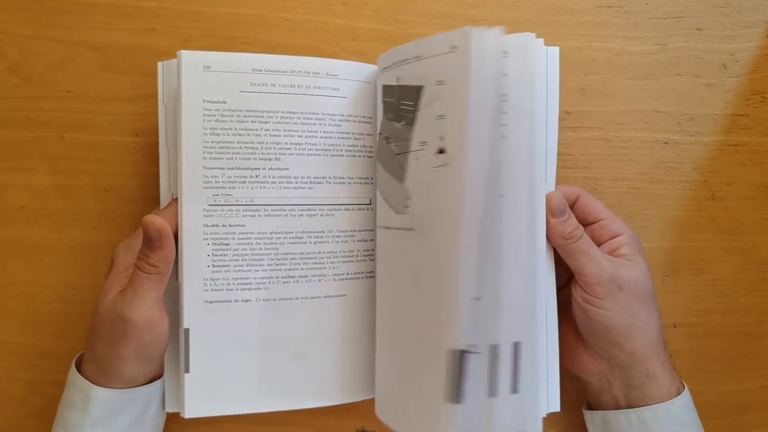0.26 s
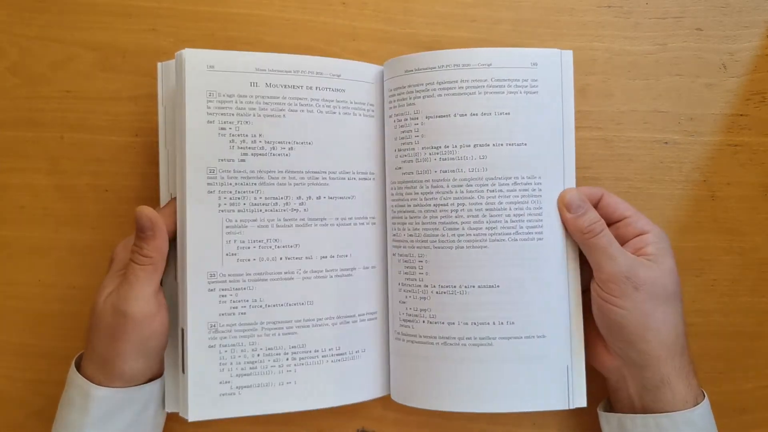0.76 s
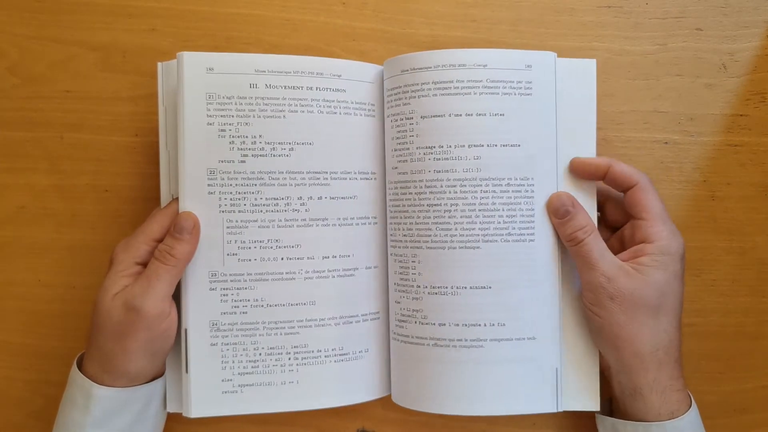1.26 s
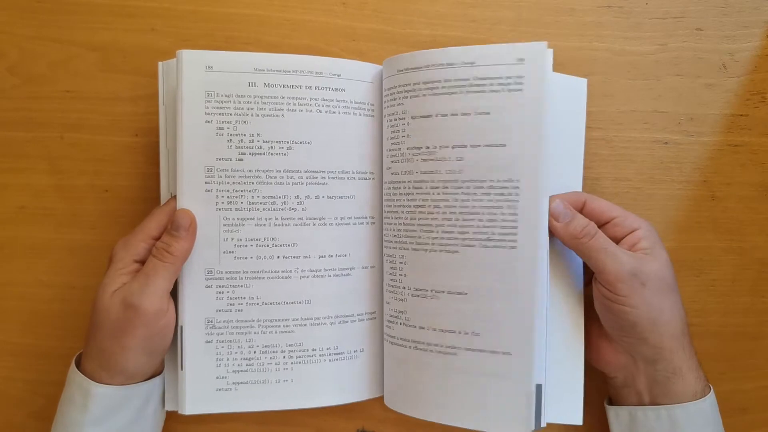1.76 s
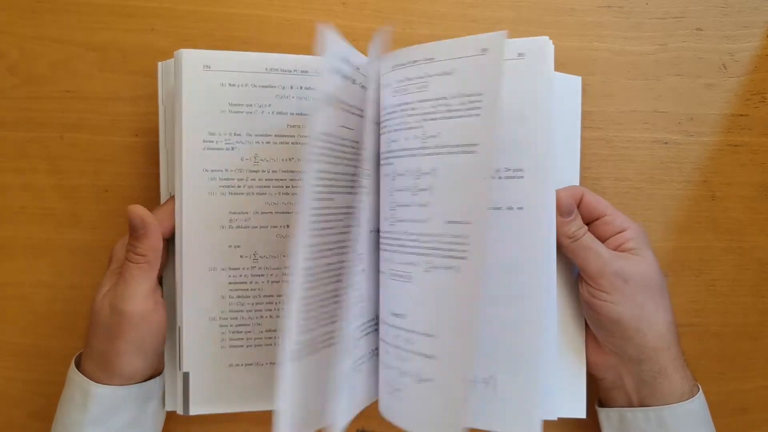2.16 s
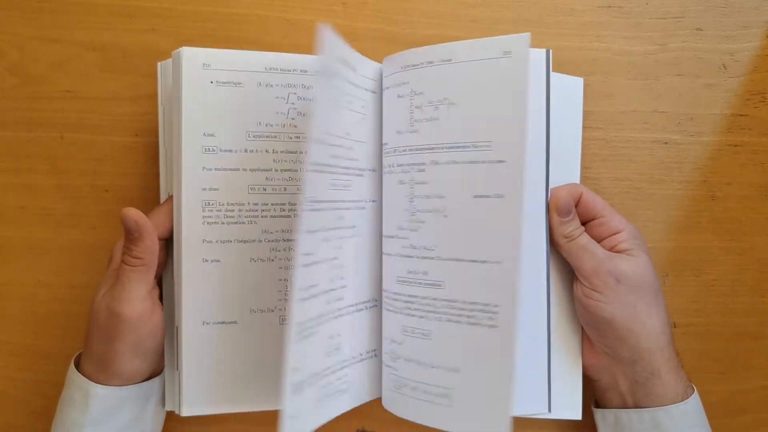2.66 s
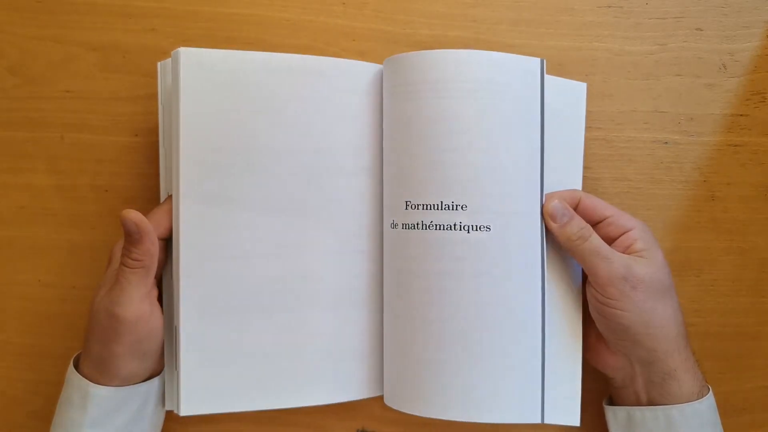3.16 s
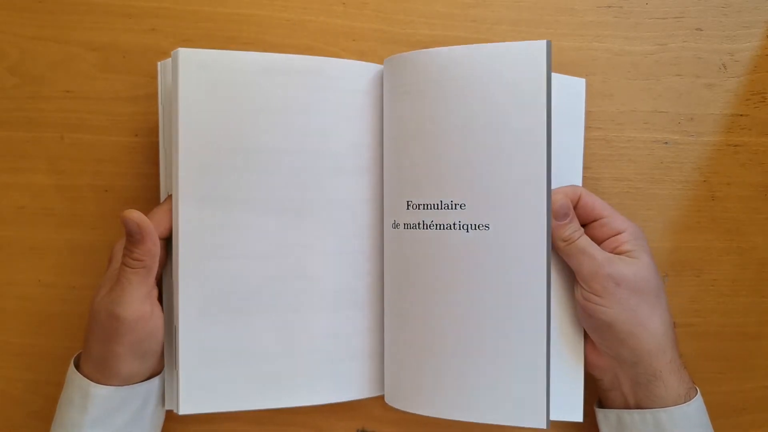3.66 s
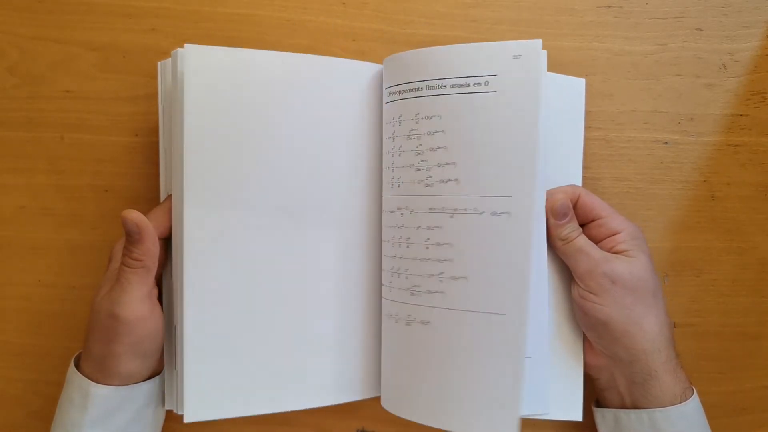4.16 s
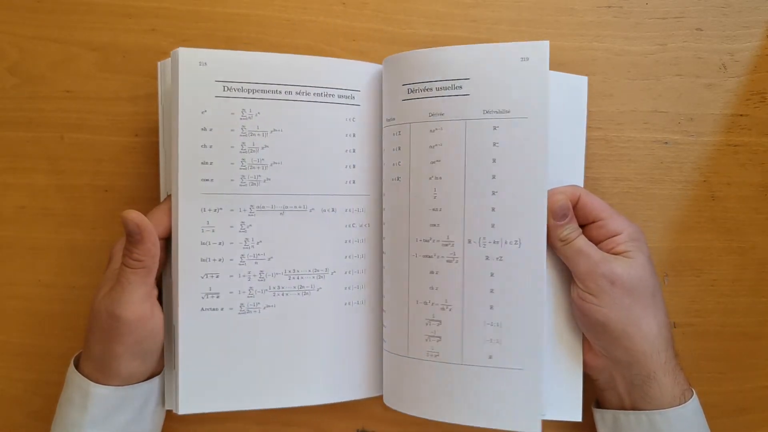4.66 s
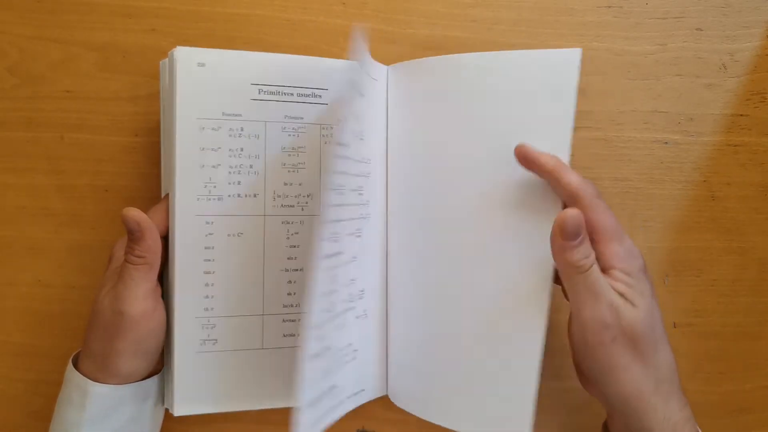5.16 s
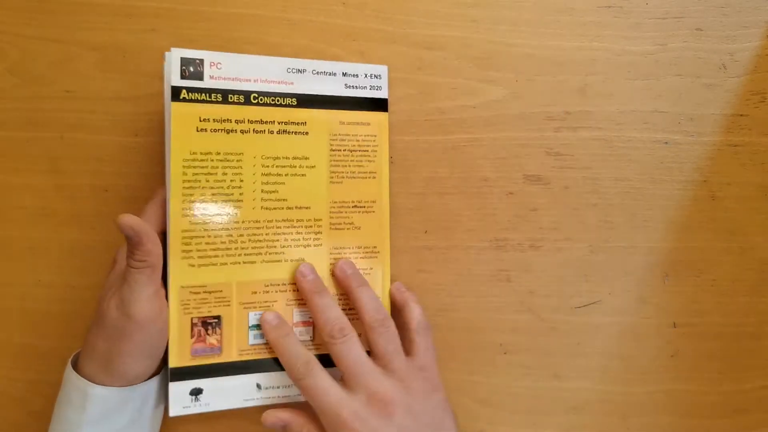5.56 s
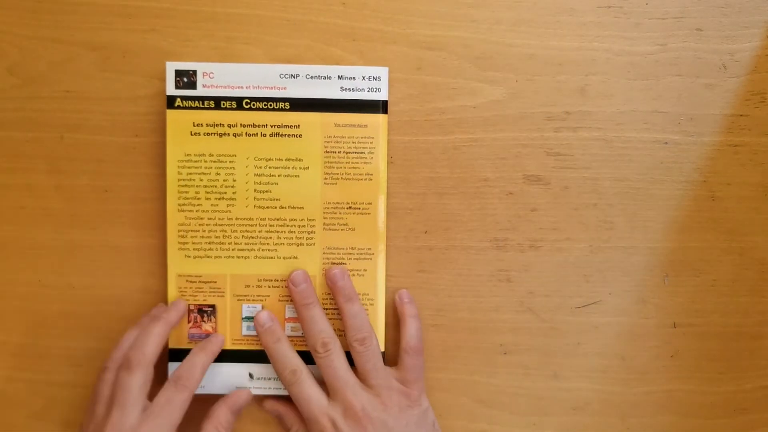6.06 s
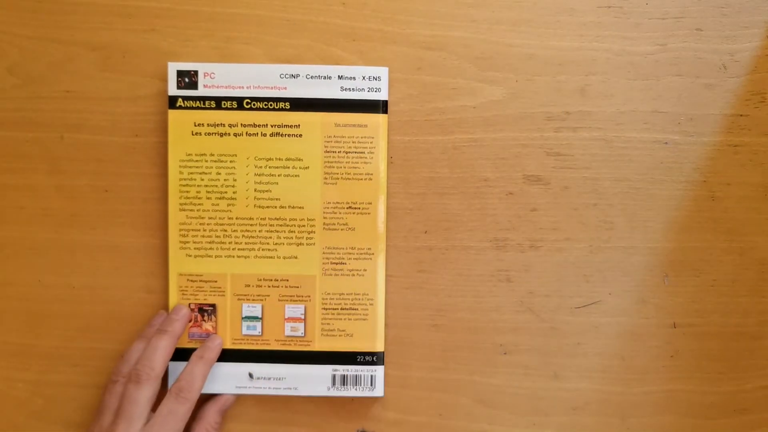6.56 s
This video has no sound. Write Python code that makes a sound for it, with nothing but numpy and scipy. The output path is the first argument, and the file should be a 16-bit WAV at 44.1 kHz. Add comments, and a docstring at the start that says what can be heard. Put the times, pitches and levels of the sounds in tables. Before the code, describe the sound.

A thumb riffles and turns the pages of a thick paperback, making soft, uneven rustles dotted with crisp paper snaps. The book closes with a louder flurry, slides over a wooden table and lands flat with a hollow thump, the loudest sound. A light rub and a brief swipe of a hand across the cover follow. It is all heard close by in a quiet room.

```python
"""The pages of a thick paperback rustle and snap as a thumb riffles and turns them. The rustle is paper sliding
over paper; a snap is a page springing free or landing. The book is shut and dropped flat on a wooden table: a
puff of air thumps and the table top rings. Hands rub the table with a hollow sound. Last, a hand wipes the
cover. Behind it all is a quiet room, and the table rumbles faintly as the hands jolt it."""
import sys
import numpy as np
from scipy import signal
from scipy.fft import rfft, irfft
from scipy.io import wavfile
from scipy.ndimage import uniform_filter1d

SR = 44100
rng = np.random.default_rng(int(sys.argv[2]) if len(sys.argv) > 2 else 0)


def dump_mix(stems):
    """Bounce the given channels to the path in sys.argv[1] as a 16-bit WAV at rate SR."""
    frames = np.atleast_2d(stems).T  # one column per channel
    limited = np.clip(frames, -1, 1)  # hard clip at full scale
    pcm = np.round(limited * 32767).astype(np.int16)
    wavfile.write(sys.argv[1], SR, pcm)


N = 299874
T, HZ = np.arange(N) / SR, np.fft.rfftfreq(N, 1 / SR)


def amp(db):
    return 10 ** (np.asarray(db) / 20)


def unit_level(x):
    return x / np.sqrt(np.mean(x ** 2) + 1e-30)


def curve_over_hz(points):
    hz, value = np.transpose(points)
    return np.interp(np.log(HZ + 1), np.log(hz + 1), value)


def panned(left_lead_db):
    return amp(np.array([left_lead_db, -left_lead_db]) / 2)


def noise_spectra(gain, likeness, grain=1):
    """Left and right noise spectra; likeness pairs a frequency in Hz with how alike they are (1 = same)."""
    left, other = rfft(rng.standard_normal((2, N)) * grain)
    alike = np.clip(curve_over_hz(likeness), -1, 1)
    return gain * np.array([left, alike * left + np.sqrt(1 - alike ** 2) * other])


def stroke_power(peak_s, rise_s, fall_s):
    """One movement swells and fades; rise and fall are the times between the peak and 20 dB below it."""
    before = np.maximum(peak_s - T, 0) / max(rise_s, .01)
    after = np.maximum(T - peak_s, 0) / max(fall_s, .01)
    return amp(-40 * np.minimum(before ** 1.28 + after ** 1.09, 6))  # powers above 1 round the top


def movement_level(rows):
    """The strength of several movements together."""
    return np.sqrt(sum(amp(2 * db) * stroke_power(*timing) for *timing, db in rows))


# The tone of the steady hush. Each row: frequency in Hz, relative level in dB.
HUSH_TONE = [(8.8, -44), (15, 1.5), (92, -12.5), (286, -21.5), (685, -26), (816, -26), (1850, -34.5),
             (2080, -30), (6870, -36.5), (7720, -57.5), (11000, -34), (16000, -42)]
# How wide the hush sounds. Each row: frequency in Hz, likeness of left and right.
HUSH_LIKENESS = [(60, 0.88), (240, 0.11), (950, 0.0055), (3770, -0.17), (15000, -0.16)]
# The tone of the shaking table. Each row: frequency in Hz, relative level in dB.
RUMBLE_TONE = [(15, 2.5), (60, 2), (110, -3.5), (200, -21.5), (400, -34.5)]
# The hands jolt the table. Each row: peak time, rise and fall in seconds, level in dB.
HAND_JOLTS = [(5.42, 0.18, 0.1, -60.5), (5.81, 0.13, 0.57, -58.5), (6.76, 0.13, .2, -55)]


def hush_and_rumble(hush_db=-70, tremble_db=-73.5):
    """Room air and microphone hiss, plus the low shaking of the table."""
    hush = unit_level(irfft(noise_spectra(amp(curve_over_hz(HUSH_TONE)), HUSH_LIKENESS), N))
    shaking = noise_spectra(amp(curve_over_hz(RUMBLE_TONE)), likeness=[(30, 1.0), (300, 0.93)])
    rumble = unit_level(irfft(shaking, N)) * panned(5.8)[:, None]
    return amp(hush_db) * hush + rumble * (amp(tremble_db) + movement_level(HAND_JOLTS))


def fibre_slips(per_s, spread_db, length_s, smooth):
    """Fibres catch and slip, adding tiny uneven jumps to a smooth level."""
    chance, size = rng.random(N), np.minimum(rng.exponential(1, N), 4)
    jumps = amp(spread_db * size) * (chance < per_s / SR)
    slips = signal.lfilter([1], [1, -np.exp(-1 / (length_s * SR))], jumps)
    return smooth + unit_level(slips)


# The tone of paper. Each row: frequency in Hz, relative level in dB.
PAPER_TONE = [(71, -57), (120, -27.5), (445, -10), (727, 0.5), (805, -7.5), (930, -4), (1140, -9),
              (2810, -9), (3110, -12.5), (4140, -16), (9000, -24.5), (16000, -29.5)]
# Tones lifted by the air between the table and a phone above it.
# Each row: frequency in Hz, width in Hz, boost in dB.
AIR_GAP_TONES = [(582, 210, 1.5), (1400, 52, 5), (2084, 172, 7.5), (2864, 94, 2), (4160, 270, 1),
                 (5085, 89, 7), (6700, 390, 7)]
# How wide the paper sounds. Each row: frequency in Hz, likeness of left and right.
PAPER_LIKENESS = [(100, 0.94), (600, 0.6), (1400, 0.069), (3000, 0.11), (7000, 0.03), (15000, 0.046)]
# The microphone openings favour one side. Each row: frequency in Hz, left minus right in dB.
MIC_BALANCE = [(60, 9), (110, 7), (200, 3.5), (380, 0), (700, -5), (1290, 1), (2380, -3.5), (4400, 1.5),
               (8120, -1.5), (15000, -9.5)]


def paper_bands(grain, patchy_db, edges_hz=(470, 1200, 4000)):
    """Paper noise in four equally strong bands: body (middle), crisp (high), hiss (top) and puff (low)."""
    boost_db = sum(db / (1 + (2 * (HZ - hz) / width) ** 2) for hz, width, db in AIR_GAP_TONES)
    spectra = noise_spectra(amp(curve_over_hz(PAPER_TONE) + boost_db), PAPER_LIKENESS, grain)
    noise = irfft(spectra * panned(curve_over_hz(MIC_BALANCE)), N)
    # a bending sheet rings at narrow tones that come and go as its curve changes
    hz, _, frames = signal.stft(noise, SR, nperseg=1024)
    tones = uniform_filter1d(rng.standard_normal(frames.shape[1:]), size=2, axis=0)
    tones = unit_level(uniform_filter1d(tones, size=7, axis=1))
    frames = frames * amp(patchy_db * tones / (1 + hz[:, None] / 5000))
    bent = rfft(signal.istft(frames, nperseg=1024)[1][:, :N])
    low, mid, high = (1 / (1 + (HZ / edge) ** 6) for edge in edges_hz)
    return np.array([unit_level(irfft(bent * band, N)) for band in (mid - low, high - mid, 1 - high, low)])


# Sliding pages. Each row: peak time, rise and fall in seconds, body level in dB,
# then crispness and hiss in dB above that level.
PAGE_STROKES = [(0.16, 0.13, 0.18, -72.5, -0.5, -10), (0.27, 0.16, 0.071, -68, 5, -4),
                (0.569, 0.032, 0.072, -55, 1, -3), (0.72, 0.051, .08, -81.5, -21, -21),
                (0.951, 0.018, 0.091, -63.5, -1, -5), (1.01, 0.12, 0.16, -62, 7, 4),
                (1.07, 0.14, 0.14, -58.5, 4, 0.5), (1.14, 0.047, 0.072, -44, 0.5, -7.5),
                (1.291, 0.069, 0.2, -57.5, 4, 0.5), (1.442, .14, 0.17, -50.5, 4, -3),
                (1.6, 0.065, 0.05, -62.5, 9, -18), (1.735, 0.13, 0.074, -58, 2, -8),
                (1.9, .05, 0.36, -65.5, -2.5, -9), (2.14, 0.3, 0.28, -72.5, 2.5, -2.5),
                (2.33, 0.055, 0.28, -67, -8.5, -18), (2.5, 0.18, .2, -66, -5.5, -10.5),
                (2.67, 0.2, 0.094, -69, -13, -14), (2.89, 0.13, 0.23, -70.5, 0, -0.5),
                (2.985, 0.098, 0.3, -60, -3, -14), (3.29, 0.041, 0.066, -77.5, 6, 2),
                (3.409, 0.063, 0.071, -80, 8.5, 2), (3.605, 0.03, 0.16, -66.5, -1, -10),
                (3.81, 0.096, 0.074, -77, 2, -5), (4.005, 0.042, 0.14, -71, -5, -6),
                (4.235, .1, 0.064, -74.5, -16.5, -18), (4.48, 0.06, 0.13, -73, -7.5, -13),
                (4.555, 0.056, 0.1, -71.5, -6, -9), (4.827, 0.054, 0.114, -59, -1, -7.5),
                (4.894, 0.1, 0.066, -58.5, -3.5, -17), (5.03, 0.097, .1, -65.5, -4, -11),
                (5.157, 0.12, 0.13, -43, 1, -7.5), (5.25, 0.16, 0.16, -50.5, 5, -1),
                (5.338, 0.17, 0.099, -49, -1, -9), (5.645, 0.042, .17, -53.5, 2, 1.5),
                (5.76, .08, 0.1, -63.5, 10, 5.5), (5.85, 0.1, 0.2, -62.5, -24, -3.5),
                (6.04, 0.088, 0.17, -76, 6, 9), (6.206, 0.041, 0.14, -66, 5, -3),
                (6.35, 0.082, 0.13, -62.5, 3.5, -9), (6.58, 0.11, 0.36, -72.5, -4, -3.5)]


def page_rustle(rest_db=(-88.5, -85, -86)):
    """Sheets slide over each other and over the thumb; the held book never lies quite still."""
    power = np.append(amp(rest_db) ** 2, 0)[:, None] * np.ones(N)
    for *timing, level_db, crisp_db, hiss_db in PAGE_STROKES:
        puff_db = -12.5 - 0.93 * crisp_db  # dull strokes move more air
        bands_db = level_db + np.array([0, crisp_db, hiss_db, puff_db])
        power = power + amp(2 * bands_db)[:, None] * stroke_power(*timing)
    sheet = paper_bands(fibre_slips(per_s=250, spread_db=3.2, length_s=.004, smooth=2.2), patchy_db=6.5)
    # steady rubbing keeps each band's strength even over a tenth of a second
    local_power = uniform_filter1d((sheet ** 2).mean(1, keepdims=True), size=SR // 10, axis=2)
    sheet = sheet / np.sqrt(local_power + 1e-9)
    return (sheet * np.sqrt(power)[:, None]).sum(0)


# Pages springing free or landing. Each row: peak time in seconds, body level in dB,
# crispness and hiss in dB above that level, rise in milliseconds.
PAGE_SNAPS = [(0.098, -73, 6, 0, 1), (0.203, -66, 11, 1, 1.1), (0.243, -71, 10, -6, 1.5),
              (0.273, -64, 9, -6, 0.89), (0.316, -68, 11, 6, 1), (0.55, -54.5, 11, -2, 2.5),
              (0.94, -72, -6, -13, 1.1), (1.143, -40, -3, 2.5, 3.3), (1.277, -52, -28, -14, 0.46),
              (2.191, -61.5, 3, -4, 3.3), (2.308, -63, 4.5, 1, 1.5), (2.426, -52, -12, -29, 1.1),
              (2.456, -55.5, -10, -16, 1.4), (2.529, -59, 10.5, 6.5, 0.25), (2.563, -58.5, -25, -20, 0.8),
              (2.971, -32.5, -5, -18.5, 0.75), (3.07, -58.5, 1, -6, 2.9), (3.106, -63.5, 6.5, -3, 4.6),
              (3.155, -58, -1, -4, 3.3), (3.238, -69, -12, -20, 0.61), (3.277, -69, 6, 6, 1),
              (3.586, -56, -4, -1, 0.5), (3.612, -52.5, 3, -6, 0.65), (3.807, -74, 6.5, -2, 0.89),
              (3.989, -49, -7, 5, 0.21), (4.497, -67, -1, -4, 2), (4.541, -53.5, -5, -6.5, 1.1),
              (4.822, -46, -3.5, -4.5, 2.2), (5.024, -55.5, 2, 3.5, 4.3), (5.076, -48, 5.5, -10, 3.4),
              (5.105, -37.5, -10, -8.5, 1.5), (5.156, -25.5, 5, -10.5, 2.5), (5.233, -48.5, 7, -14, 2.8),
              (5.339, -45.5, 6.5, 6, 12), (5.62, -52.5, -7, -12, 0.87), (5.652, -55, 10, 11, 5),
              (5.764, -59, -3, 16, 5.5), (5.8, -32, -13.5, -9, 0.84), (6.036, -65, 8, 14.5, 4.1),
              (6.142, -72, 5.5, 13, 4.4)]


def page_snaps(fade_s=0.089, medium_db=-50.5):
    """Each snap swells, cracks and dies away, the treble sooner than the body; quick ones crack harder."""
    grain = fibre_slips(per_s=1100, spread_db=2.7, length_s=0.00064, smooth=1.5)
    sheet, out = paper_bands(grain, patchy_db=3.5), np.zeros((2, N))
    for peak_s, level_db, crisp_db, hiss_db, rise_ms in PAGE_SNAPS:
        puff_db = -18 - 0.48 * crisp_db - 0.6 * (level_db - medium_db)  # the puff grows less than the crack
        span = slice(round((peak_s - .04) * SR), round((peak_s + .3) * SR))
        age = T[span] - peak_s
        swell = np.exp(np.minimum(age, 0) * 1000 / max(rise_ms, .1))
        after = np.maximum(age, 0)
        bands = [(0, 1, .4), (crisp_db, 1.4, .7), (hiss_db, 1.8, 1.2), (puff_db, .7, 0)]
        for band, (db, fade_speed, crack) in enumerate(bands):
            crack /= max(rise_ms, .6)
            spike = (1 + crack * np.exp(-after / 0.0005)) / (1 + crack)
            shape = swell * amp(-60 * fade_speed * after / fade_s) * spike
            burst = unit_level(sheet[band, :, span] * shape)
            # the blow sets the energy, whatever part of the sheet answers it
            out[:, span] += amp(level_db + db) * burst * np.sqrt(np.mean(shape ** 2))
    return out


# Hands rub the table top. Each row: peak time, rise and fall in seconds, level in dB.
TABLE_RUBS = [(5.36, 0.042, .15, -59.5), (5.7, 0.24, 0.19, -61.5), (5.9, 0.18, 0.18, -57),
              (6.35, 0.12, 0.16, -57.5), (6.56, 0.14, 0.21, -63), (6.72, 0.086, 0.41, -57.5)]
# The table top's own tones, heard in the rub and the thump. # Each row: frequency in Hz, relative level in dB,
# seconds to fade by 60 dB after a blow.
TABLE_TONES = [(66.8, -6, 0.32), (180, -4.5, 0.34), (254.4, 0.5, 0.15), (370, 2.5, 0.2), (389, -3, 0.25),
               (483, 3.5, 0.09), (596, -21, 0.41), (673, -8.5, 0.186), (773, 0.5, 0.061), (880, -19, 0.45),
               (1240, -31, 0.19)]


def table_rub():
    """Hands rubbing the table stir its tones, all but the lowest, into a hollow rub."""
    wood = sum(amp(db) / (1 + 1j * (HZ - hz) / 22) for hz, db, _ in TABLE_TONES[1:])
    rub = irfft(noise_spectra(wood, likeness=[(100, 1.0), (800, 0.45)]), N)
    return unit_level(rub) * movement_level(TABLE_RUBS)


def book_thump(land_s=5.7988, puff_s=.00045):
    """The book lands flat: a puff of air, its rebound, and the table top ringing."""
    age = T - land_s
    puff = np.exp(-(age / puff_s) ** 2 / 2)
    rebound = .45 * np.exp(-((age - .0012) / .0006) ** 2 / 2)
    ring_age = np.maximum(age - .002, 0)
    ring = sum(amp(db - 60 * ring_age / fade_s) * np.sin(2 * np.pi * hz * ring_age) * (-1) ** k
               for k, (hz, db, fade_s) in enumerate(TABLE_TONES))
    ring = ring / abs(ring).max() * np.minimum(ring_age / 0.00164, 1)
    return amp(-15) * (puff - rebound + amp(-10.5) * ring) * panned(1.0)[:, None]


# The tone of skin on the cover. Each row: frequency in Hz, relative level in dB.
SKIN_TONE = [(120, -31), (200, -25), (473, -5.5), (548, -8.5), (1420, -1.5), (1560, -6.5), (2910, 2),
             (11100, -25.5), (16000, -35)]
# The palm sweeps off the cover. Each row: time in seconds, level in dB.
WIPE_LEVELS = [(6.694, -45.5), (6.722, -39), (6.8, -51)]


def cover_wipe():
    """Skin drags over the glossy cover: dense, bright friction."""
    grain = fibre_slips(per_s=900, spread_db=2.5, length_s=0.0034, smooth=4.5)
    likeness = [(300, 0.8), (3000, 0.057), (9000, .05)]
    friction = irfft(noise_spectra(amp(curve_over_hz(SKIN_TONE)), likeness, grain), N)
    times, levels_db = np.transpose(WIPE_LEVELS)
    return unit_level(friction) * amp(np.interp(T, times, levels_db)) * (T > times[0])


# How fast the room's echo dies. Each row: frequency in Hz, seconds to fade by 60 dB.
ECHO_FADES = [(100, 0.47), (500, 0.4), (2000, 0.1), (8000, 1)]


def room_echo(sound):
    """Half a second of scattered reflections, each band dying at its own speed."""
    echoes = rng.choice([-1., 1.], (2, SR // 2)) * (rng.random((2, SR // 2)) < .05)
    echoes[:, :200] = 0  # a short gap before the first reflection
    hz, age, frames = signal.stft(echoes, SR, nperseg=256)
    hz = hz[:, None]
    apart = np.clip(hz / 900, .2, 1)  # long bass waves reach left and right alike
    frames[1] = apart * frames[1] + np.sqrt(1 - apart ** 2) * frames[0]
    points_hz, fades_s = np.transpose(ECHO_FADES)
    fade_s = np.interp(np.log(hz + 1), np.log(points_hz), fades_s)
    bass_cut = np.minimum(hz / 250, 1)
    tail = signal.istft(frames * amp(-60 * age / fade_s) * bass_cut, SR, nperseg=256)[1]
    return signal.fftconvolve(sound, tail / np.linalg.norm(tail[0]), axes=1)[:, :N]


def scene():
    """All the sounds together; the thump echoes far more than the paper."""
    handling = page_rustle() + page_snaps() + cover_wipe()
    thump = book_thump()
    echo = room_echo(amp(-20.0) * handling + amp(-0.5) * thump)
    return handling + thump + echo + table_rub() + hush_and_rumble()


def record(dry, cutoff_hz=15950):
    """The recorder cuts off the very highest treble."""
    lowpass = signal.firwin(511, cutoff_hz, window=("kaiser", 9), fs=SR)
    return signal.oaconvolve(dry, lowpass[None], "same")


dry = scene()
out = record(dry)
dump_mix(out)
```